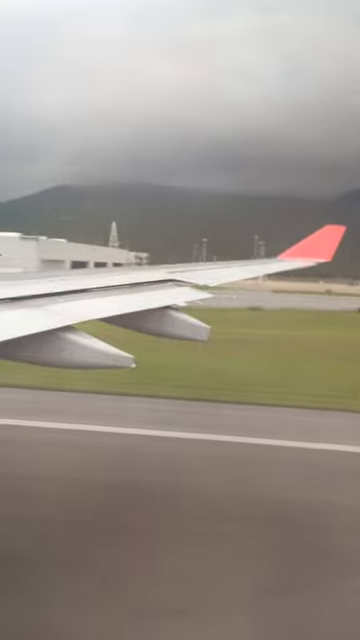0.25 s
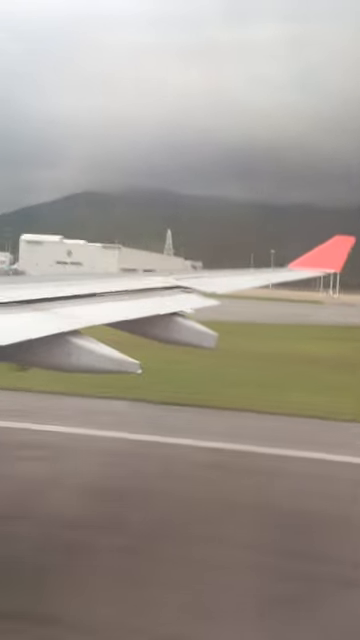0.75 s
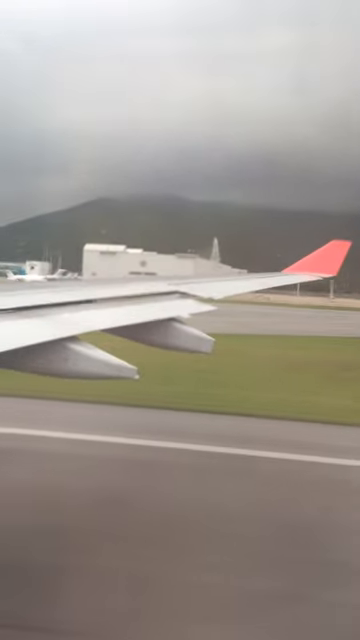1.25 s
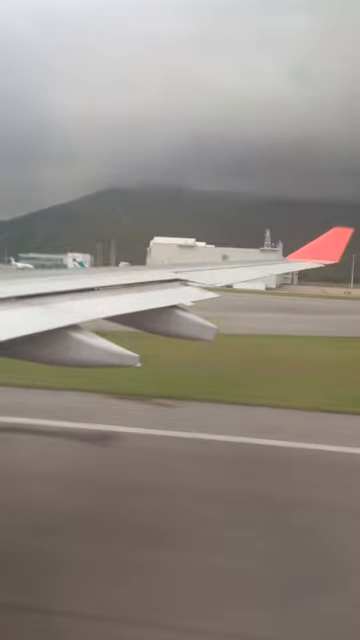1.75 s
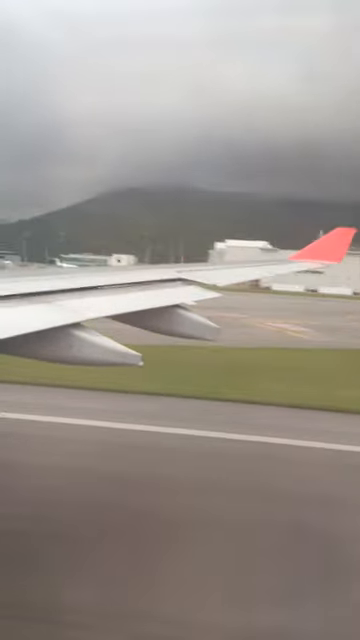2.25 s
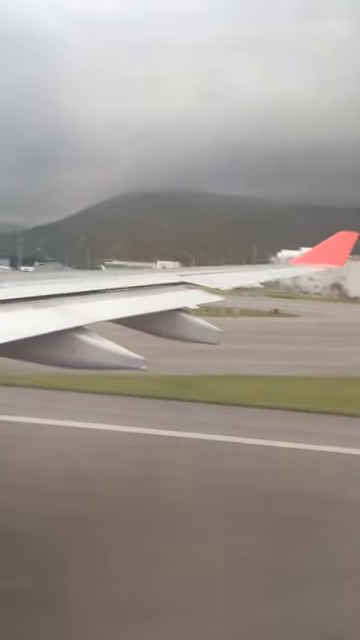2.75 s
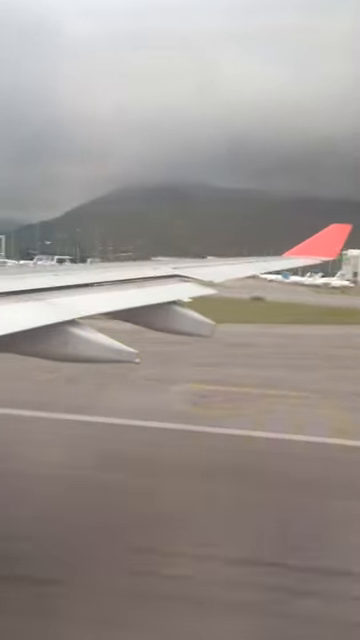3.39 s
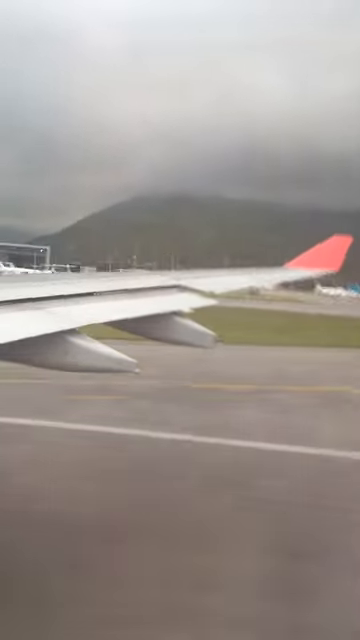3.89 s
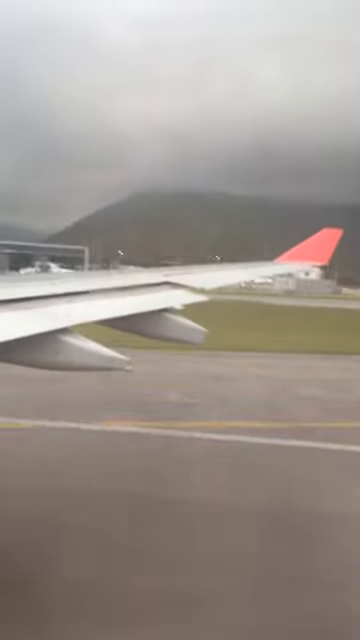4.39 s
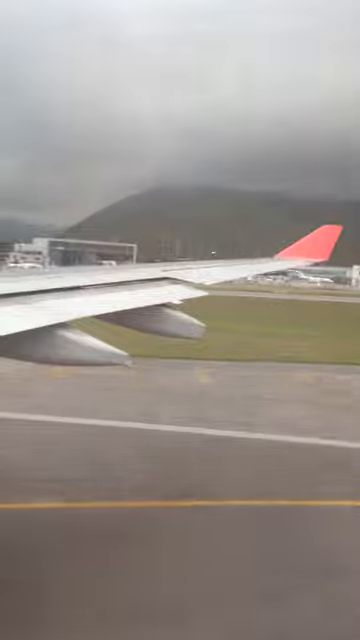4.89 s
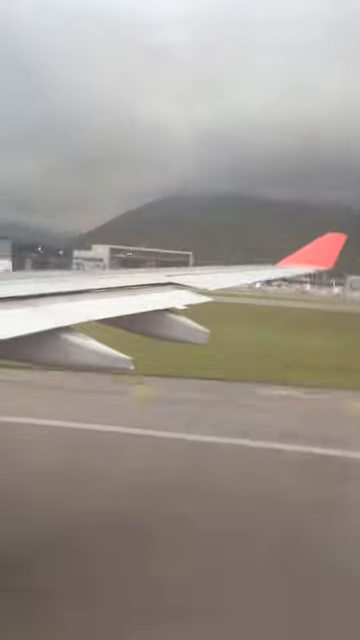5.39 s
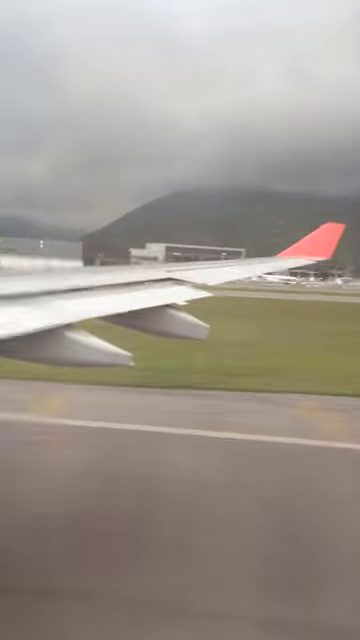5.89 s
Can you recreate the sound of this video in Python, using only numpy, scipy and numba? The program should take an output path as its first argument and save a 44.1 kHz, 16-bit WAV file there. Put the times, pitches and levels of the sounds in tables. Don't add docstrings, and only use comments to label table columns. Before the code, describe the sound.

Inside an airliner cabin speeding down a runway, heard close to the window on a phone. A heavy, low boom and jet roar fill everything, with muffled jet noise through the wall and soft vent hiss above. Runway bumps make the boom surge briefly; a loose metal fitting buzzes and clacks faintly, and a plastic panel ticks, most busily near the end. The loud boom is squashed and makes the hiss pump.

```python
import sys
import numpy as np
from scipy import signal
from scipy.fft import rfft, irfft, next_fast_len
from scipy.io import wavfile
from scipy.ndimage import uniform_filter1d, minimum_filter1d, map_coordinates
from numba import njit

SR = 44100
rng = np.random.default_rng(int(sys.argv[2]) if len(sys.argv) > 2 else 0)


def digitize_waveform(pressure):
    field = np.atleast_2d(pressure).T
    bounded = np.clip(field, -1, 1)
    quanta = np.round(bounded * 32767).astype(np.int16)
    wavfile.write(sys.argv[1], SR, quanta)


def decibels_to_gain(level_db):
    exponent = np.asarray(level_db, float) / 20
    return 10 ** exponent


N = 270774


def unit(x):
    return x / np.sqrt(np.mean(x ** 2) + 1e-20)


def along(points, hz):
    f, v = np.transpose(points)
    return np.interp(np.log(hz + 1), np.log(f + 1), v)


def wobble(rate):
    knots = rng.standard_normal(int(N * rate / SR) + 4)
    return map_coordinates(knots, [np.arange(N) * rate / SR])


def filtered(x, response):
    m = next_fast_len(N + SR // 2)
    return irfft(rfft(x, m) * response(np.fft.rfftfreq(m, 1 / SR)), m)[:N]


def modes(table):
    def response(f):
        total = 0
        for k, (c, w, db) in enumerate(table):
            total = total + (-1) ** k * decibels_to_gain(db) * 1j * f * w / (c * c - f * f + 1j * f * w)
        return total
    return response


def rush(response, patchy_db):
    z = signal.stft(rng.standard_normal(N), nperseg=512)[2]
    field = uniform_filter1d(rng.standard_normal(z.shape), size=8, axis=0)
    field = uniform_filter1d(field, size=12, axis=1)
    noise = signal.istft(z * decibels_to_gain(patchy_db * unit(field)), nperseg=512)[1][:N]
    return unit(filtered(noise, response))


def add_at(track, start_s, sound):
    track[round(start_s * SR):][:len(sound)] += sound


# start_s, level_db
AIRFLOW = [(0.0, -39), (0.79, -38.5), (1.04, -40), (2.31, -37), (2.79, -39.5), (3.35, -39), (4.55, -39.5),
           (4.86, -40), (5.44, -41.5), (5.73, -38.5), (6.14, -37)]


def airflow():
    start_s, level_db = np.transpose(AIRFLOW)
    flow_db = np.interp(np.arange(N) / SR, start_s, level_db)
    return flow_db - flow_db.mean()


# peak_s, level_db
BUMPS = [(0.26, -17), (0.6, -11), (0.9, -10), (1.3, -5.5), (2.049, -17.5), (2.53, -14), (3.05, -17),
         (3.26, -7.5), (3.63, -15.5), (4.0, -14.5), (4.08, -9.5), (4.378, -12), (4.71, -2), (4.981, -11),
         (5.222, -6), (5.54, -10.5), (5.72, -20), (5.882, -14.5), (6.072, -15)]
SURGE_RISE_S, SURGE_FALL_S = 0.029, 0.033


def surges():
    t = np.arange(N) / SR
    total = np.zeros(N)
    for s, db in BUMPS:
        spread_s = np.where(t < s, SURGE_RISE_S, SURGE_FALL_S)
        total += decibels_to_gain(db) * np.exp(-((t - s) / spread_s) ** 2)
    return total


# pitch_hz, level_db (per Hz)
ROLL = [(8.8, -48), (15, -38.5), (54, -10), (86, -5.5), (116, -1.5), (135, 6), (152, -3.5), (179, -5),
        (305, -11.5), (364, -21), (435, -28.5), (490, -34), (520, -35), (680, -60.5), (1140, -120)]
# pitch_hz, width_hz, level_db
SHELL = [(129.8, 30.5, 2.5), (146.4, 32.6, 0.5)]
BOOM_DB, BOOM_SAG_DB_PER_S = -15, 0.6
ROAR_DB, ROAR_SHARE_DB, ROAR_FOLLOWS = -18, -17, .8


def fuselage():
    t, surge = np.arange(N) / SR, surges()
    boom = np.zeros(N)
    for hz, width, db in SHELL:
        boom += decibels_to_gain(db) * rush(lambda f: modes([(hz, width, 0)])(f) ** 2, patchy_db=-0.35)
    boom_level = decibels_to_gain(-3.0) * (decibels_to_gain(BOOM_DB - BOOM_SAG_DB_PER_S * t) + surge)
    roar = rush(lambda f: decibels_to_gain(along(ROLL, f)) / (1 + 1.09 * abs(modes([(136, 45, .1)])(f))), patchy_db=0.3)
    swing_db = 1.5 + ROAR_FOLLOWS * airflow() + 1.3 * wobble(14)
    roar_level = (decibels_to_gain(ROAR_DB) + decibels_to_gain(ROAR_SHARE_DB) * surge) * decibels_to_gain(swing_db)
    return boom_level * unit(boom) + roar_level * roar


# pitch_hz, level_db (per Hz)
SKIN = [(220, -28.5), (380, -5.5), (440, 1.5), (497, -12.5), (561, -6), (708, -11.5), (779, -9.5),
        (975, -17), (1190, -18), (1300, -20.5), (2440, -31), (3000, -43), (3900, -64), (6600, -120)]
# pitch_hz, width_hz, level_db
SKIN_MODES = [(452, 21, -0.5), (547, 120, -3.5), (808, 73, -0.5)]
# pitch_hz, level_db (per Hz)
VENT = [(1060, -12.5), (1800, -1.5), (2440, -6.5), (2940, -7.5), (5910, -13.5), (9410, -26), (14600, -32.5),
        (15200, -36.5)]
SKIN_DB, VENT_DB, VENT_FOLLOWS = -38.5, -53.5, 0.55
HISS_SHARE_DB = -1


def air():
    swing_db = airflow()
    skin = rush(lambda f: decibels_to_gain(along(SKIN, f)) * (1 + .4 * abs(modes(SKIN_MODES)(f))), patchy_db=.5)
    vent = rush(lambda f: decibels_to_gain(along(VENT, f)) * (1 + .3 * abs(modes([(2550, 350, 0)])(f))), patchy_db=.9)
    skin_level = decibels_to_gain(SKIN_DB + 1 + swing_db + .45 * wobble(20))
    vent_level = decibels_to_gain(VENT_DB + 2.0 + VENT_FOLLOWS * swing_db + .6 * wobble(25))
    return (1 + decibels_to_gain(HISS_SHARE_DB) * surges()) * (skin_level * skin + vent_level * vent)


# start_s, length_s, body_db, thin_db (thin parts over body)
JOLTS = [(0.056, 0.066, -57.5, -14), (0.284, 0.01, -61, -11.5), (0.833, 0.029, -59.5, -13.5),
         (0.999, 0.032, -60.5, -9.5), (1.373, 0.035, -57.5, -15.5), (1.527, 0.023, -57.5, -15),
         (2.267, 0.011, -55.5, -17.5), (2.284, 0.016, -63, -14.5), (2.374, 0.093, -58, -11.5),
         (2.664, 0.021, -57.5, -16), (2.783, 0.045, -61, -12.5), (3.224, 0.02, -59.5, -18.5),
         (3.371, 0.09, -57.5, -14.5), (3.527, 0.074, -58.5, -13.5), (3.712, 0.041, -58.5, -13.5),
         (4.233, 0.043, -53.5, -14), (4.337, 0.067, -58, -13.5), (4.586, 0.042, -57.5, -13),
         (4.826, 0.045, -58, -14), (5.006, 0.023, -59, -9.5), (5.115, 0.07, -56.5, -14),
         (5.256, 0.021, -55.5, -14), (5.398, 0.035, -57, -14.5), (5.526, 0.037, -52, -15),
         (5.679, 0.065, -54.5, -13.5), (6.041, 0.07, -54, -14)]
# start_s, peak_db, length_s
NUDGES = [
    (0.74, -51, 0.021),
    (1.777, -50, 0.04),
    (3.456, -53.5, 0.099),
    (4.67, -45.5, 0.017),
    (5.774, -47, 0.04),
    (5.833, -46.5, 0.033),
]
# pitch_hz, width_hz, level_db
PARTS = [
    [(4500, 97, -2), (5870, 220, -0.5), (3670, 1200, -4.5), (6500, 900, -8.5)],
    [(8600, 300, 1.5), (7400, 1200, -8.5)],
    [(11000, 500, 1), (9550, 500, -2), (12000, 1500, -11.5)],
    [(14700, 700, 1.5), (13000, 1200, -5)],
]
THIN_DB = [0.5, -0.7, -2.3]
CHATTER_RISE_S, CHATTER_T60_S, RAGGED_DB = .005, .11, 1.2
FADE_DB, SCATTER_DB = 4.5, 2.5


def chatter():
    t, out = np.arange(N) / SR, np.zeros(N)
    shake = np.zeros((len(PARTS), N))
    faint = [(s, length, db - 13, -18) for s, db, length in NUDGES]
    for s, length, db, thin_db in JOLTS + faint:
        luck = rng.standard_normal(3)
        levels_db = db + np.r_[0, thin_db + np.array(THIN_DB) + SCATTER_DB * luck]
        rise = np.clip((t - s) / CHATTER_RISE_S, 0, 1)
        fade = decibels_to_gain(-FADE_DB * np.clip((t - s) / length, 0, 1))
        decay = decibels_to_gain(-60 * np.clip(t - s - length, 0, None) / CHATTER_T60_S)
        shake += decibels_to_gain(np.c_[levels_db] + 3.5) * rise * fade * decay
    uneven = decibels_to_gain(RAGGED_DB * wobble(100) + 1.2 * wobble(300))
    for part, level in zip(PARTS, shake):
        hits = rng.random(N) < 2500 / SR
        contacts = hits * rng.standard_normal(N) * uneven * decibels_to_gain(1.5 * wobble(40))
        out += unit(filtered(contacts, modes(part))) * level
    return out


# start_s, peak_db, pitch_hz, edge_db
TICKS = [(0.2848, -34.5, 2530, -19), (0.528, -32.5, 2480, -18.5), (3.137, -41, 3200, -24),
         (4.8935, -40, 2390, -15), (5.2816, -40, 2400, -24), (5.3058, -35, 2560, -20),
         (5.329, -36, 2630, -15), (5.448, -44.5, 2360, -21), (5.456, -37, 2570, -25),
         (5.567, -39, 2340, -21.5), (5.594, -32.5, 2510, -24.5), (5.6086, -39.5, 2570, -16),
         (5.67, -32, 2460, -21), (5.7887, -36, 2320, -27), (5.8695, -35.5, 2610, -15),
         (5.876, -36, 2720, -19), (5.891, -32.5, 2400, -23), (5.909, -42, 2400, -14), (5.9, -37, 2500, -20)]


def panel():
    hollow, snap, edge, walls = np.zeros((4, N + SR))
    t = np.arange(SR // 10) / SR
    for s, db, hz, edge_db in TICKS:
        onset = 1 - np.exp(-t / 0.00041)
        add_at(hollow, s, decibels_to_gain(db + 1.5 - 60 * t / 0.02) * onset * np.sin(2 * np.pi * hz * t))
        snap[round(s * SR) + 20] += decibels_to_gain(db + 16)
        add_at(edge, s, decibels_to_gain(db + edge_db + 14 - 60 * t / 0.0086) * np.sign(rng.standard_normal(len(t))))
        add_at(walls, s, decibels_to_gain(db + 2.5 - 60 * t / .11) * rng.standard_normal(len(t)))
    bright = modes([(5200, 1500, -5.5), (7560, 1000, 3.5), (9500, 800, 1.0)])
    snap = filtered(snap[:N], lambda f: modes([(3100, 1300, .1)])(f) ** 2)
    edge = filtered(edge[:N], lambda f: bright(f) / (1 + (f / 11000) ** 6))
    walls = filtered(walls[:N], lambda f: modes([(2600, 700, .1)])(f) ** 2)
    return hollow[:N] + snap + edge + walls


# start_s, peak_db, t60_s
STRIKES = [
    (1.3813, -38, 0.046),
    (1.5485, -39.5, 0.041),
    (2.256, -37, 0.043),
    (2.6644, -42.5, 0.081),
    (3.2191, -30.5, 0.15),
    (3.5444, -40, 0.21),
    (4.2396, -40, 0.18),
    (4.3806, -38.5, 0.062),
    (4.8286, -41, 0.049),
    (6.0437, -33.5, 0.15),
]
# pitch_hz, width_hz, level_db
FITTING = [(4630, 160, 1), (5670, 320, 5), (8900, 440, -11.5), (11000, 800, -16), (14700, 900, -17)]
# start_s, peak_db, pitch_hz
PINGS = [
    (2.1644, -58, 10800),
    (4.4967, -59, 11200),
    (6.0182, -56, 11200),
]


def fitting():
    t = np.arange(SR // 10) / SR
    blows, cracks, pings = np.zeros((3, N + SR))
    for s, db, t60 in STRIKES:
        blow_t60_s = .012 + .06 * min(t60, .2)
        add_at(blows, s, decibels_to_gain(db + 3 - 60 * t / blow_t60_s) * rng.standard_normal(len(t)))
        add_at(cracks, s, decibels_to_gain(db - 2.0 - 60 * t / 0.012) * np.sign(rng.standard_normal(len(t))))
    for s, db, hz in PINGS:
        onset = 1 - np.exp(-t / 0.0022)
        add_at(pings, s, decibels_to_gain(db - 60 * t / 0.059) * onset * np.sin(2 * np.pi * hz * t))
    ring = filtered(blows[:N], modes(FITTING))
    crack = filtered(cracks[:N], lambda f: modes([(3600, 6500, .1)])(f) ** 2)
    return ring + crack + pings[:N]


def scene():
    return (fuselage() + air() + chatter() + panel() + fitting())[None]


@njit
def recover(need, step):
    gain, out = 1.0, np.empty_like(need)
    for i in range(len(need)):
        gain = min(need[i], gain + (1 - gain) * step)
        out[i] = gain
    return out


def roll_off(x):
    return signal.sosfilt(signal.butter(12, 15390, fs=SR, output="sos"), x)


def record(dry):
    ceiling, release_s = .707, .012
    x = filtered(dry[0], lambda f: decibels_to_gain(2.0) / (1 + (f / 15250) ** 60))
    need = minimum_filter1d(np.minimum(1, ceiling / (abs(x) + 1e-9)), size=301)
    gain = uniform_filter1d(recover(need, 1 / (release_s * SR)), size=151)
    return roll_off((x * gain)[None])


dry = scene()
out = record(dry)
digitize_waveform(out)
```